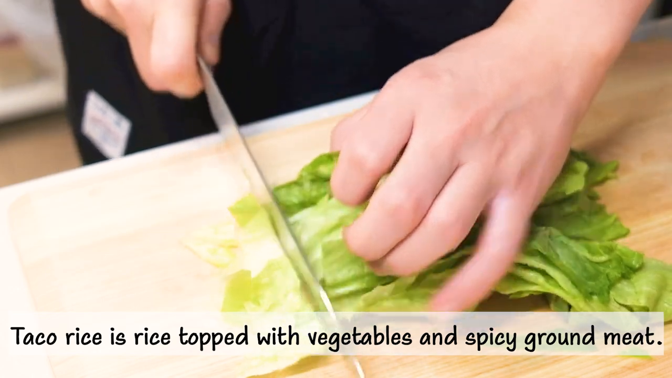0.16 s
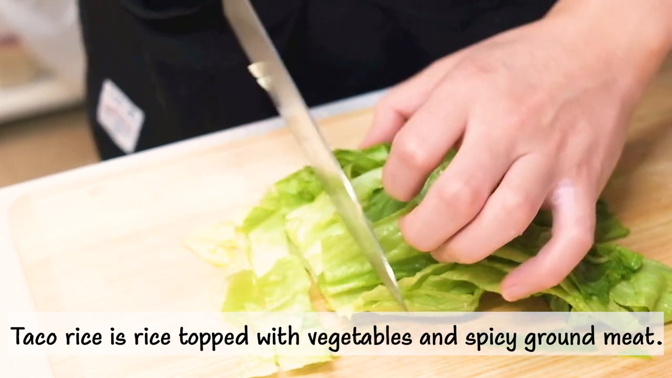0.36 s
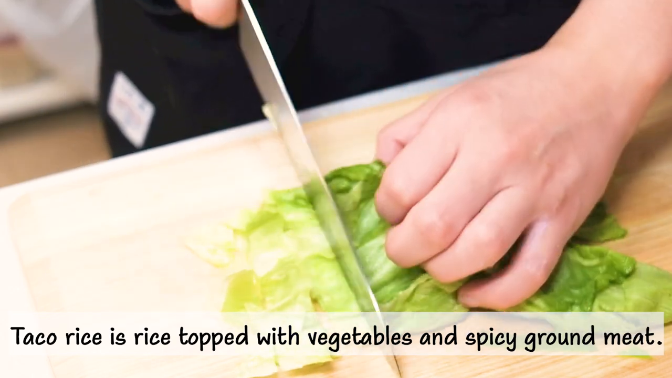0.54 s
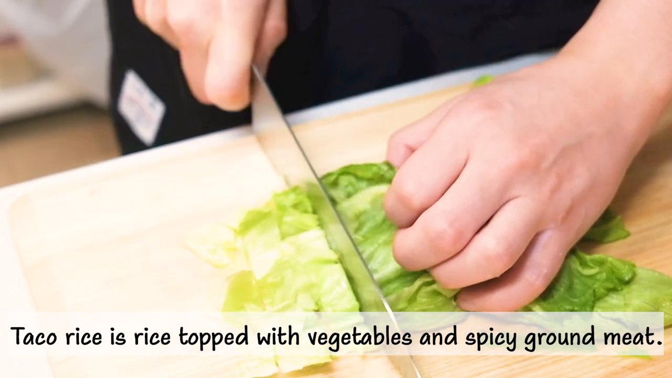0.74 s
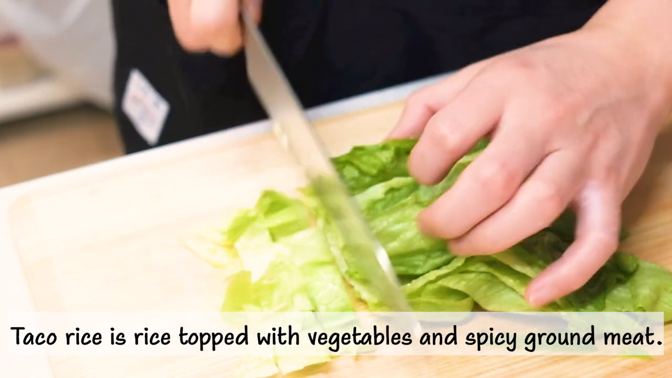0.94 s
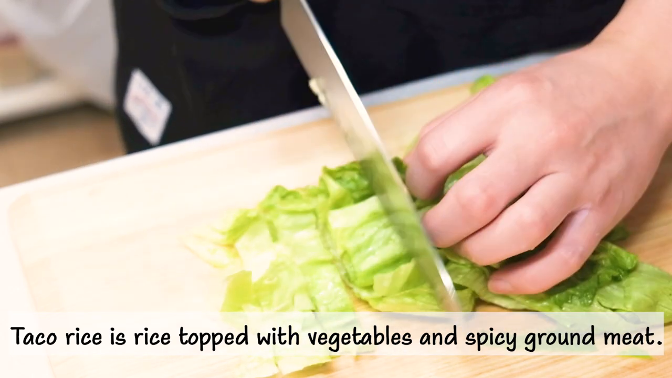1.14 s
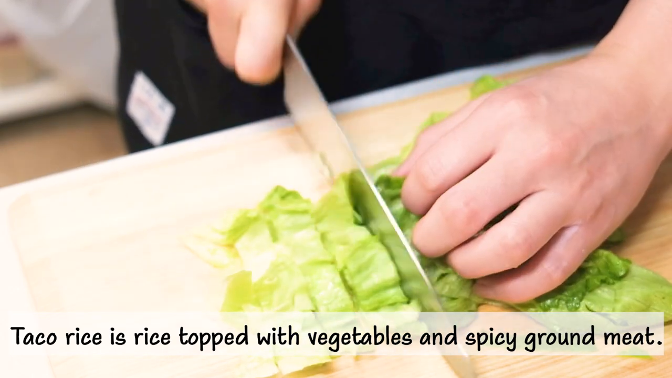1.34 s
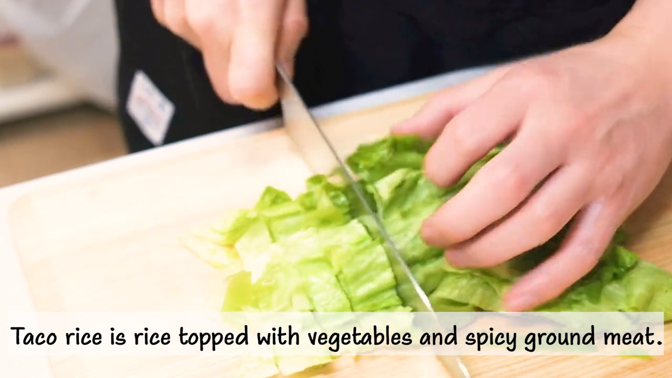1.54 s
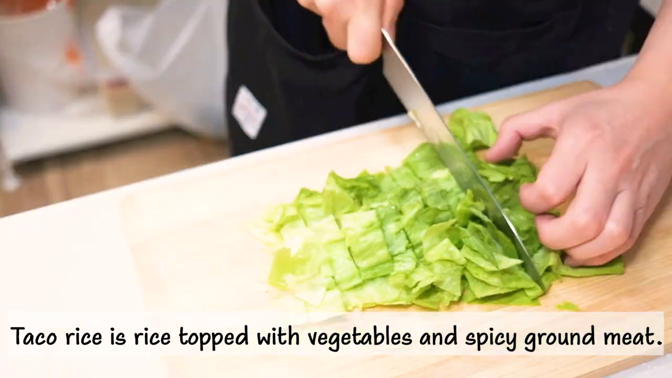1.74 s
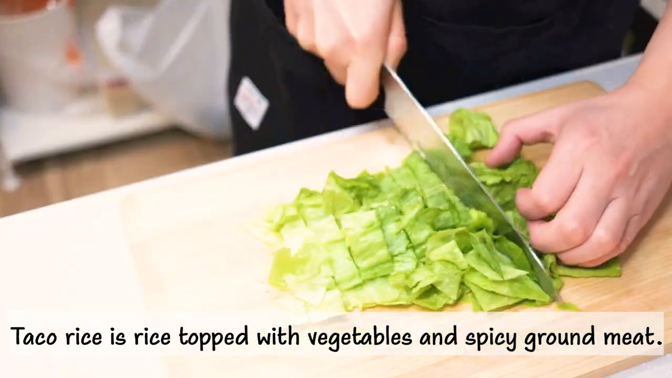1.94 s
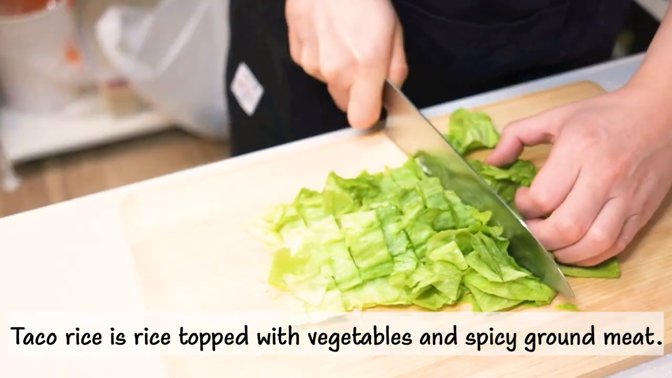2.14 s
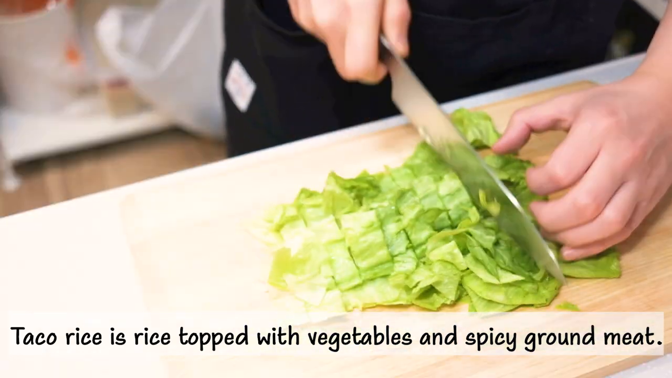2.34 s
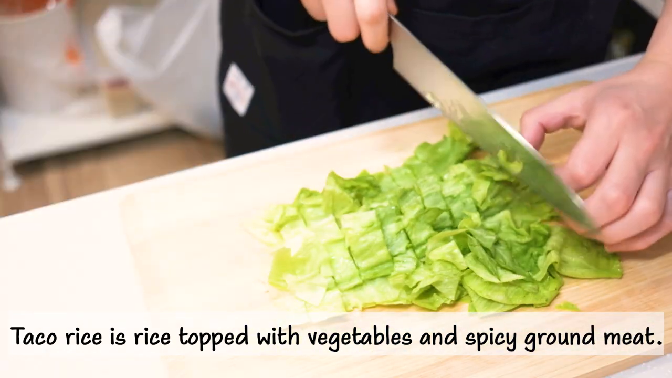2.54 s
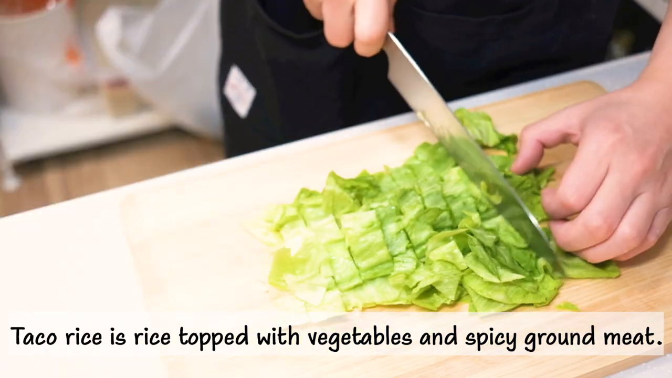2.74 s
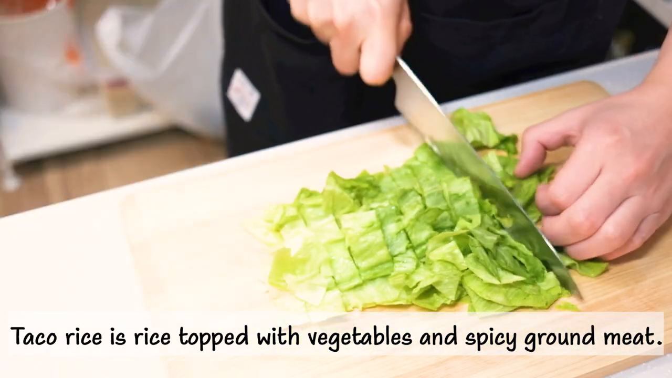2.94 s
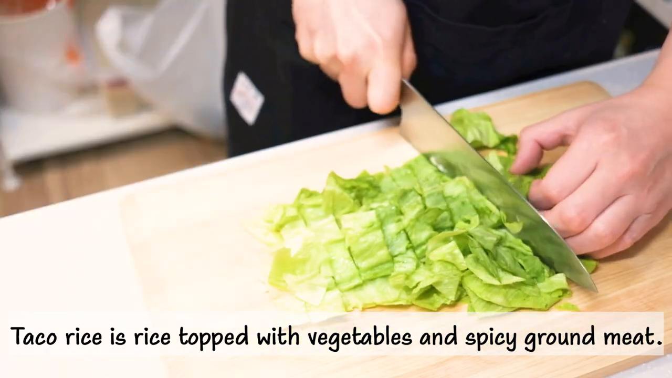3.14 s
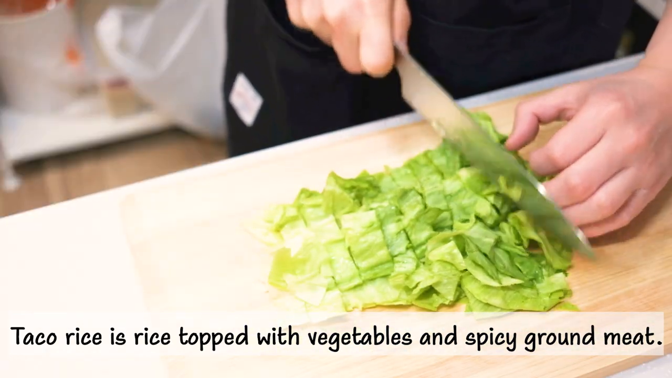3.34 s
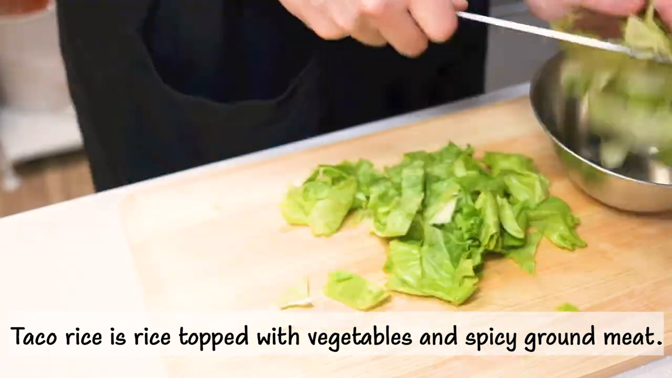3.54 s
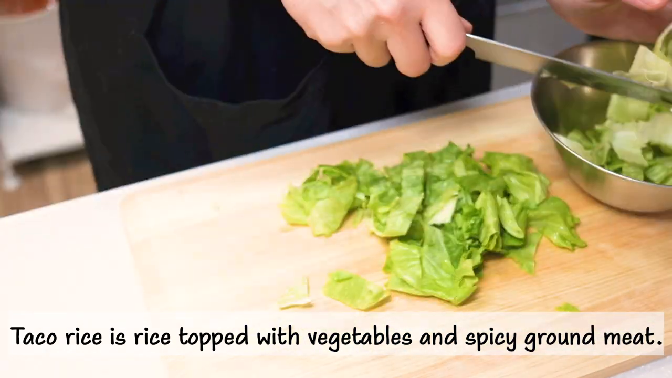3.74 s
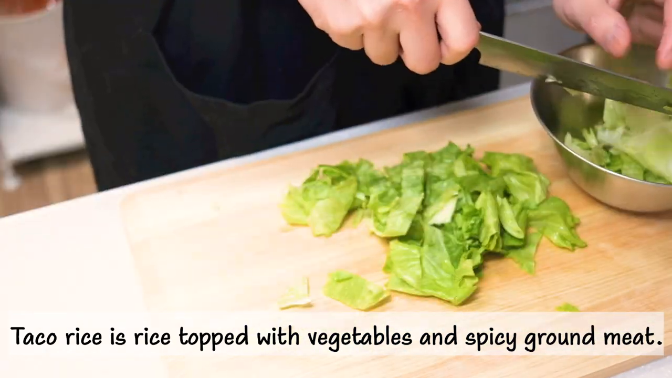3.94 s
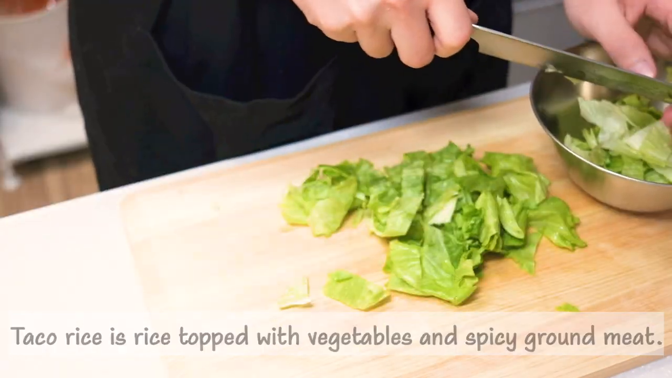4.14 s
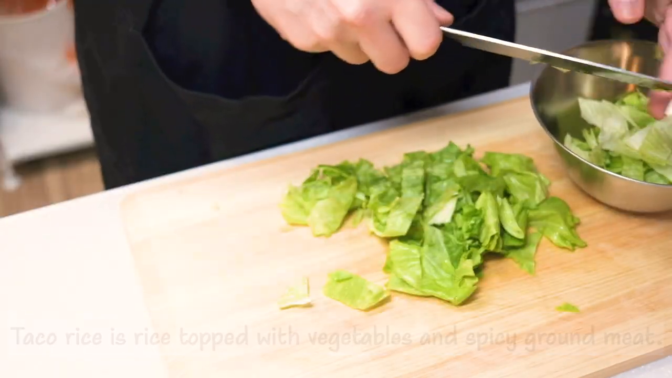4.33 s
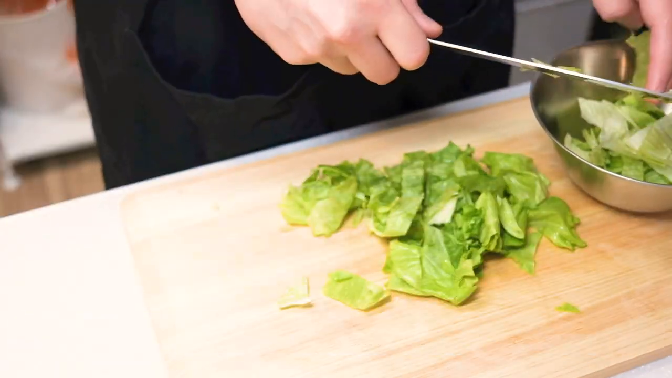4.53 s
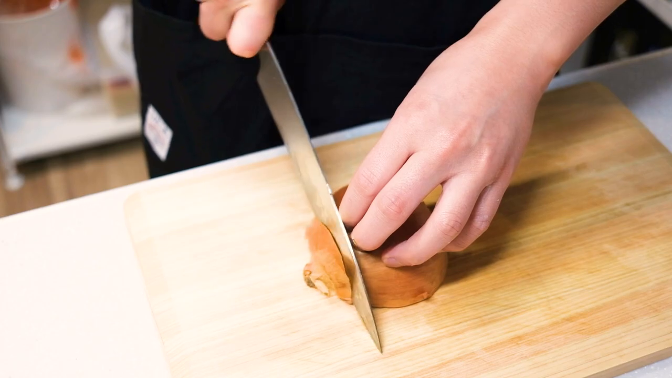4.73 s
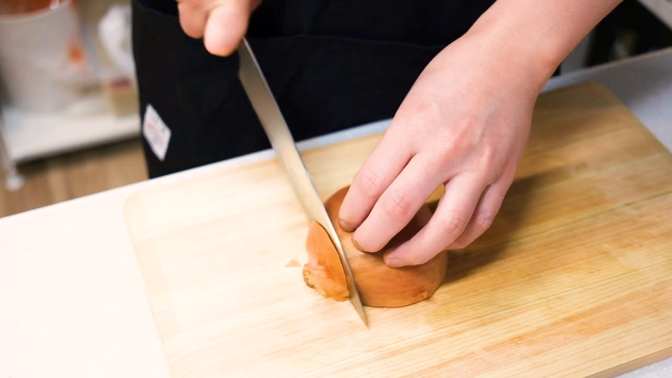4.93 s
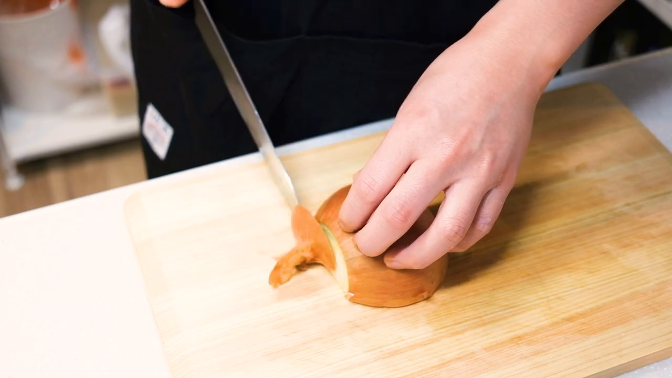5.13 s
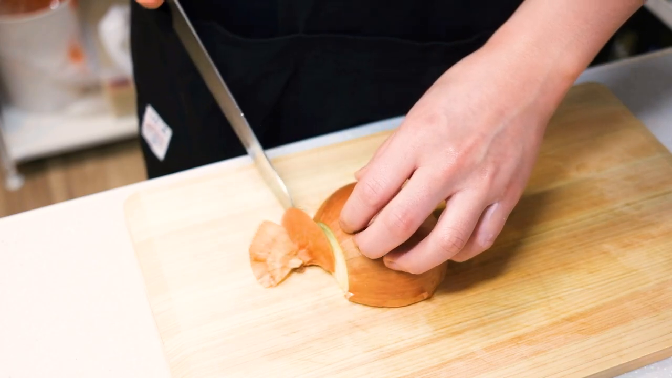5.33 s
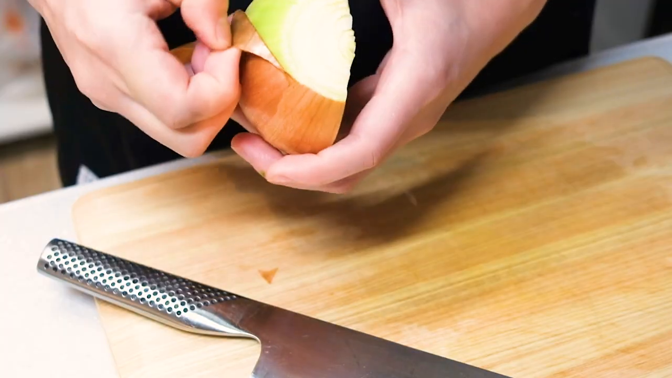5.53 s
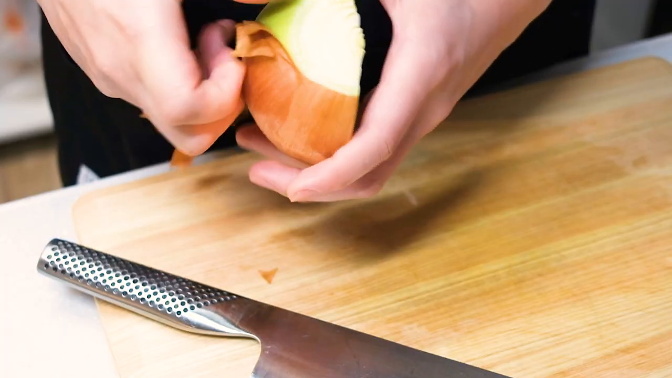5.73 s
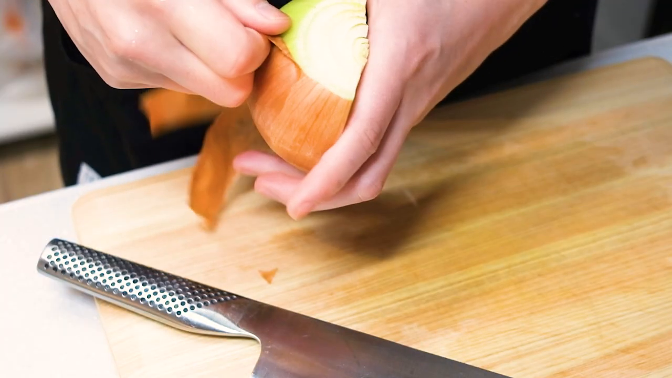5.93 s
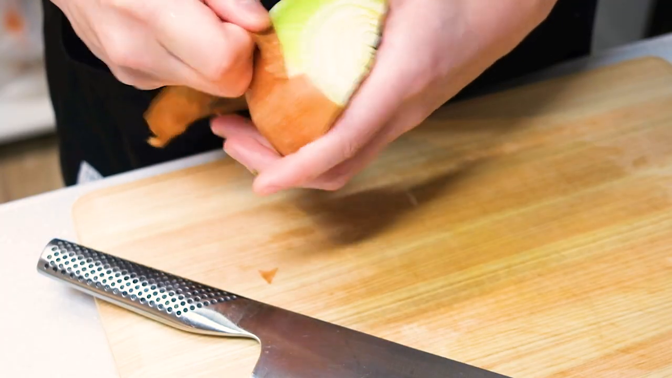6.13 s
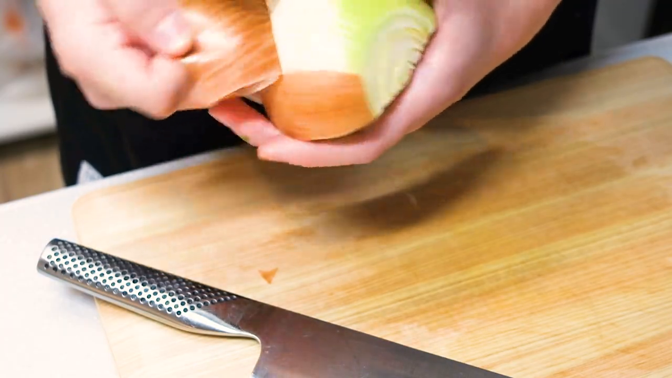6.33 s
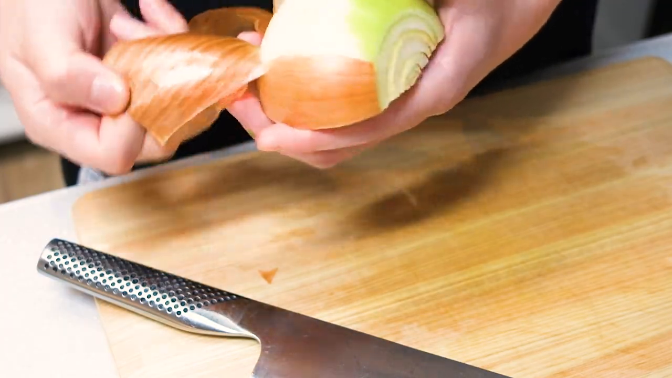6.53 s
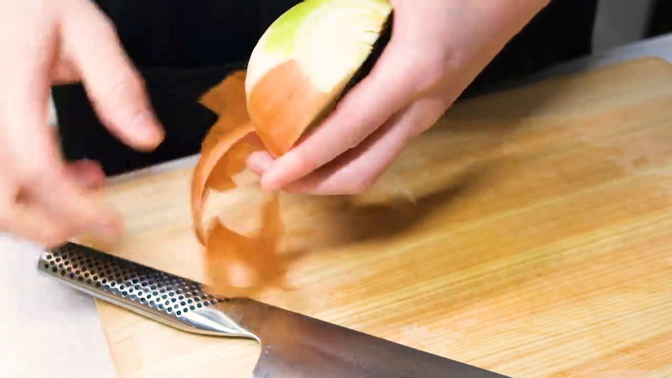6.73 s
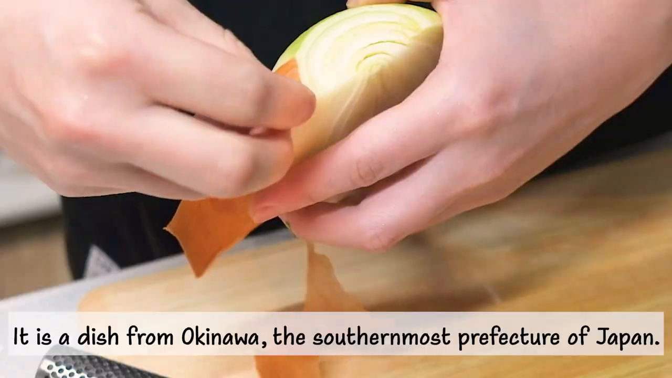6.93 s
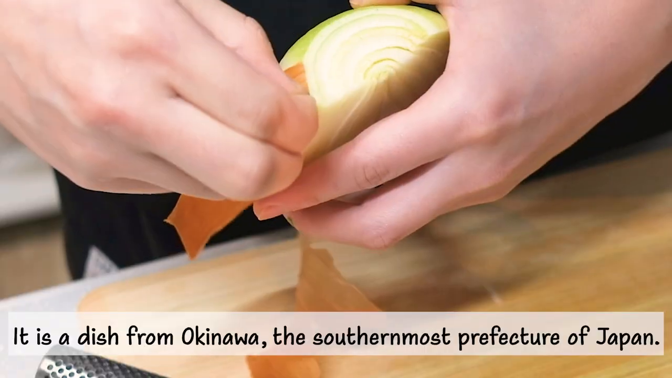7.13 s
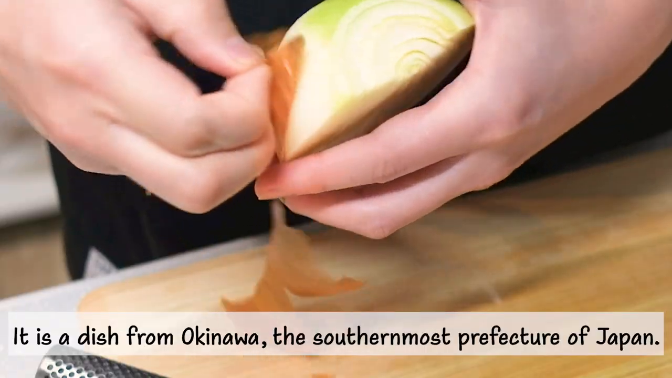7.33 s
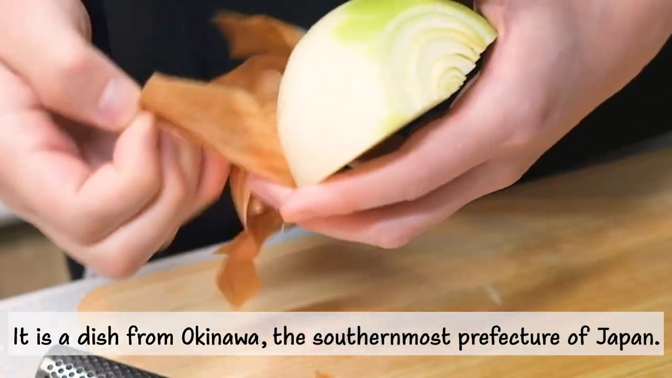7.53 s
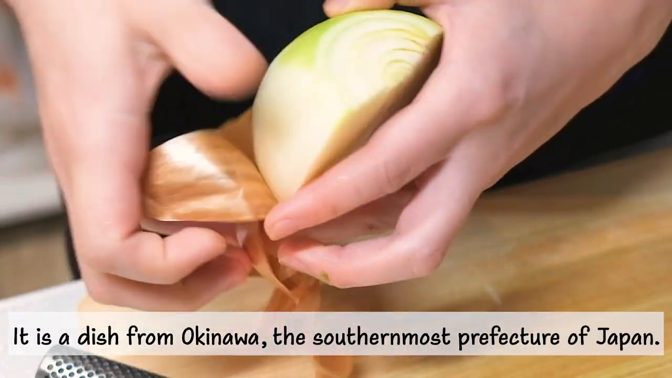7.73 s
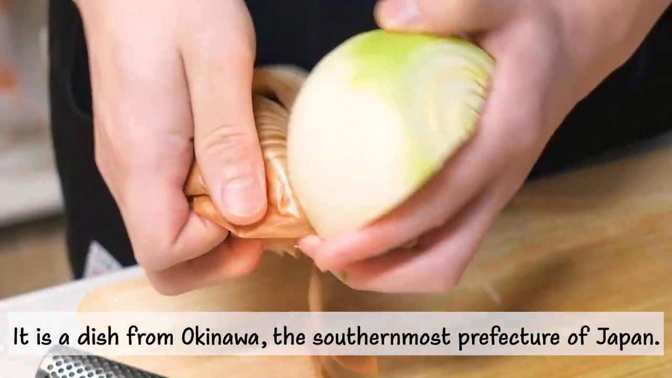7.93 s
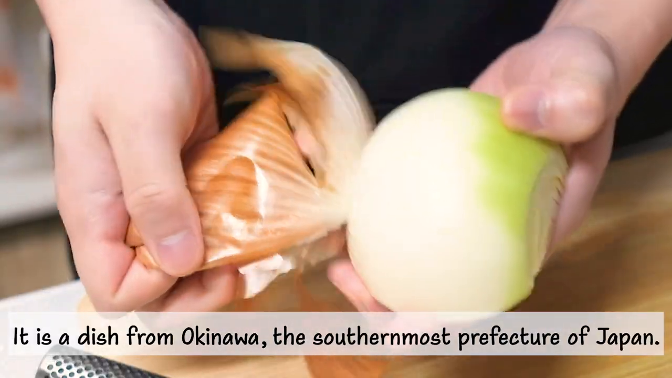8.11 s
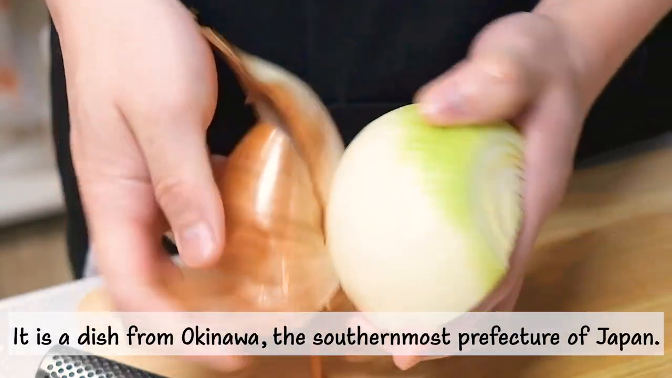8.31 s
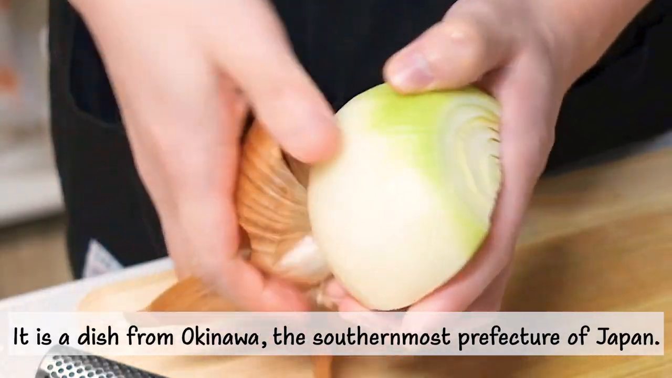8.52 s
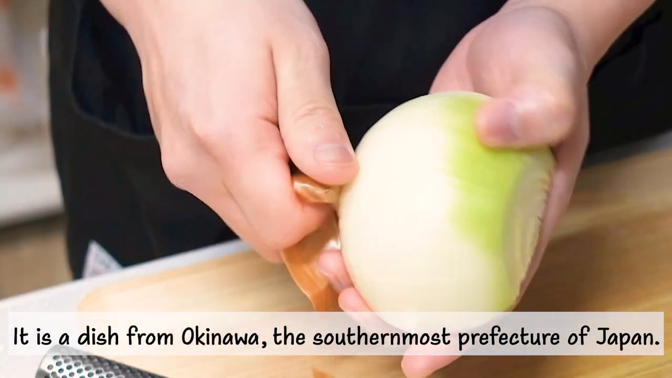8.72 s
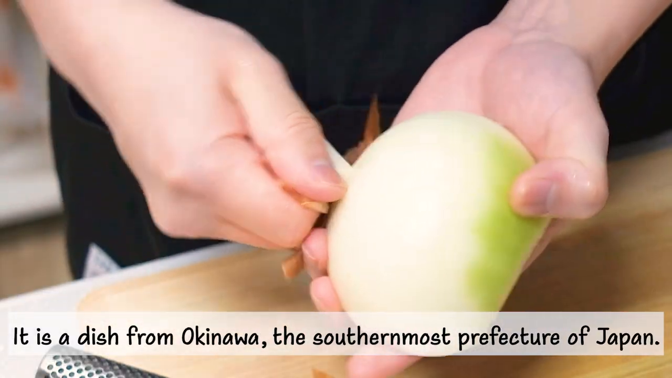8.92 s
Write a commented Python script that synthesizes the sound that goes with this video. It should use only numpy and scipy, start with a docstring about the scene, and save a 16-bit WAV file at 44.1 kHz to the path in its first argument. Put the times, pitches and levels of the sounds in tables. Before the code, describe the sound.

Close microphone in a small quiet kitchen. A chef's knife makes four slow, juicy crunches through lettuce, some with hard wooden knocks and a short rasp of edge on board. Leaves rustle softly, the blade ticks faintly, then a heavy chop parts an onion. Finally dry skin is peeled off in sharp, bright, irregular crackles.

```python
"""Lettuce and onion on a board

A chef's knife shreds lettuce on a wooden board, then cuts the end off an onion; hands peel its dry skin.
Leaves, flesh and skin are rains of tiny noise bursts plus rubbing noise, with larger snaps for ribs and cracks.
Blows ring the modes of the board, taps those of the blade; the edge rasps on wood and the worktop sways.
One close microphone in a small, quiet kitchen, with room noise and a thin electrical whine at first."""
import sys
import numpy as np
from scipy import signal
from scipy.io import wavfile
from scipy.ndimage import uniform_filter1d

SR = 44100
rng = np.random.default_rng(int(sys.argv[2]) if len(sys.argv) > 2 else 0)


def log_audio(samples):
    """Write samples as a 16-bit WAV file to the path given in sys.argv[1]."""
    # one column per channel
    frames = np.atleast_2d(samples).T
    # limit to full scale, then quantise
    limited = np.clip(frames, -1, 1)
    pcm = np.round(limited * 32767).astype(np.int16)
    wavfile.write(sys.argv[1], SR, pcm)


N = 395577
TIME = np.arange(N) / SR


def amp(db):
    """Decibels to gain."""
    return 10 ** (np.asarray(db) / 20)


def read(points, hz):
    """A table of (Hz, value) read on a log-frequency axis."""
    f, value = np.transpose(points)
    return np.interp(np.log(hz + 1), np.log(f + 1), value)


def add(mix, s, sound):
    """Mixes a sound in at time s."""
    part = mix[max(round(s * SR), 0):][:len(sound)]
    part += sound[:len(part)]


def evened(x):
    """Scales to rms 1."""
    return x / np.sqrt(np.mean(x ** 2) + 1e-20)


def band(x, lo_hz, hi_hz, order=3):
    """Causal band-pass."""
    edges = [lo_hz, min(hi_hz, SR / 2 - 1)]
    return signal.sosfilt(signal.butter(order, edges, "band", fs=SR, output="sos"), x)


def shelf(x, db, edge_hz, side):
    """Lifts or lowers everything on one side ("lowpass" or "highpass") of an edge by the curve db."""
    one_side = signal.sosfiltfilt(signal.butter(2, edge_hz, side, fs=SR, output="sos"), x)
    return x + (amp(db) - 1) * one_side


def minimum_phase(log_gain):
    """Impulse response of a log spectrum, with its energy as early as possible, so clicks stay sharp."""
    return np.exp(np.conj(signal.hilbert(log_gain)))


def colour(x, points, size=4096):
    """Causal filter with the given spectrum, so that clicks keep their sharp front."""
    gain_db = np.maximum(read(points, abs(np.fft.fftfreq(size, 1 / SR))), -100)
    taps = np.fft.ifft(minimum_phase(np.log(amp(gain_db)))).real[:size // 2]
    return signal.oaconvolve(x, taps)[:len(x)]


def running_rms(x, size=700):
    """Level over a few hundredths of a second."""
    power = uniform_filter1d(uniform_filter1d(x ** 2, size), size)
    return np.sqrt(abs(power) + 1e-12)


def fracture(hz, decay_s, octaves, size=256):
    """One break: a burst of noise, dying in about a millisecond, tinted around the pitch of its flake."""
    burst = rng.standard_normal(size) * np.exp(-np.arange(size) / SR / decay_s)
    pitch = np.log2((abs(np.fft.fftfreq(size, 1 / SR)) + 50) / hz)
    tint = minimum_phase(-np.log(1 + (pitch / octaves) ** 2))
    ring = np.fft.ifft(np.fft.fft(burst) * tint).real
    return ring / np.linalg.norm(ring)


def fractures(per_s, spread_db, clump_db, decay_s, octaves, count=28):
    """A random rain of breaks of many pitches, most tiny and a few large; a wandering strain clumps them."""
    strain = evened(band(rng.standard_normal(N), 25, 130, order=1))
    size_db = spread_db * np.minimum(rng.exponential(1, N), 4) + clump_db * np.minimum(strain, 1.5)
    sizes = amp(size_db) * (rng.random(N) < per_s / SR)
    kind = rng.integers(0, count, N)
    at = np.flatnonzero(sizes)
    shapes = np.array([fracture(hz, decay_s, octaves) for hz in np.geomspace(1200, 15000, count)])
    shapes *= np.sqrt(np.geomspace(1, 10, count))[:, None]  # high breaks spread over a wider band
    places = at[:, None] + np.arange(shapes.shape[1])
    breaks = shapes[kind[at]] * sizes[at, None]
    return evened(np.bincount(places.ravel(), breaks.ravel(), N)[:N])


def crunch(gains, spectrum, grains, rub_db, crisp_db, body_db, lumps_db):
    """Breaks and rubbing heard directly (crisp) and through the flexing material (body), giving way unevenly."""
    sound = colour(grains + amp(rub_db) * rng.standard_normal(N), spectrum)
    crisp, body = band(sound, 2800, 20000), band(sound, 70, 2800, order=5)
    # both are levelled first, so that the movements alone shape them
    crisp = crisp / running_rms(crisp)
    body = body / running_rms(band(body, 700, 2800))
    lumps = np.clip(evened(band(rng.standard_normal(N), 15, 50, order=2)), -2, 2)
    return amp(lumps_db * lumps) * (amp(crisp_db) * gains[0] * crisp + amp(body_db) * gains[1] * body)


# colour of a loud crack: f/Hz, level/dB
SNAP_COLOUR = [(200, -29), (700, 2), (3000, -3), (6500, -3.5), (8600, 4), (10500, -13.5), (13000, 0.5),
               (16000, -11.5)]


def snaps(rows, octaves, decay_s, crest_db, shiver_db, shiver_s, rise_s=.0007):
    """Each crack, rise_s after its listed time, is one large fracture, and the freed piece shivers."""
    out, t = np.zeros(N), np.arange(1024) / SR
    for s, peak_db, hz in rows:
        shiver = rng.standard_normal(len(t)) * np.exp(-t / shiver_s)
        shiver *= amp(shiver_db) / np.linalg.norm(shiver)
        shiver[0] += 1
        crack = colour(signal.fftconvolve(shiver, fracture(hz, decay_s, octaves)), SNAP_COLOUR, size=512)
        # the peak stands crest_db over the level taken across 1 ms
        level = amp(peak_db - crest_db) * np.sqrt(SR / 1000)
        add(out, s + rise_s, level * crack / np.linalg.norm(crack))
    return out


def swell(s, rise_s, hold_s, fall_db_per_s):
    """The gain of one movement: it swells from 15.5 dB down, holds and dies away."""
    end = s + rise_s + hold_s
    db = np.interp(TIME, [s, s + rise_s], [-15.5, 0], left=-120)
    return amp(db - fall_db_per_s * np.maximum(TIME - end, 0))


def together(parts):
    """Crisp and body gains of overlapping movements, each given as (gain, body dB), summed in power."""
    return np.sqrt(sum(np.array([gain, gain * amp(body_db)]) ** 2 for gain, body_db in parts))


def movements(rows, fall_db_per_s):
    """Crisp and body gains of a run of small movements."""
    return together((amp(db) * swell(s, rise_s, hold_s, fall_db_per_s), body_db)
                    for s, rise_s, hold_s, db, body_db in rows)


# colour of the room noise: f/Hz, level/dB
AIR_COLOUR = [(15, -40), (25, 2), (76, -13.5), (108, -2.5), (190, -5), (236, -8), (270, -6.5), (416, -8),
              (863, -10.5), (1020, -13.5), (1190, -13), (1400, -15.5), (2610, -23), (8590, -28),
              (16000, -36)]
AIR_DB = -55.5
WHINE_HZ, WHINE_DB, WHINE_END_S = 9950, -73.5, 2.1


def air():
    """Steady room noise, with a thin electrical whine during the first cuts."""
    hiss = evened(colour(rng.standard_normal(N), AIR_COLOUR, size=8192))
    fade = np.clip((WHINE_END_S - TIME) * 20, 0, 1)
    whine = np.sqrt(2) * np.sin(2 * np.pi * WHINE_HZ * TIME) * fade
    return amp(AIR_DB) * hiss + amp(WHINE_DB) * whine


# the blade presses on the leaves before it bites; levels are against the stroke's level
PRESS_S, PRESS_START_DB, PRESS_END_DB, BITE_S = 0.091, -24.5, -13.5, 0.003
THICK_S, STOP_DB_PER_S = 0.014, 342
# body against crisp: the crunch deepens as the blade nears the board
BITE_BODY_DB, STOP_BODY_DB = -9, -5


def stroke(bite, thick, stop, level_db, thick_db):
    """The blade presses, bites, meets the thick of the leaves and stops: (gain, body dB)."""
    press = np.interp(TIME, [bite - PRESS_S, bite - BITE_S, bite], [PRESS_START_DB, PRESS_END_DB, 0],
                      left=-np.inf)
    crush = thick_db * np.exp(-((TIME - thick) / THICK_S) ** 2 / 2)
    release = STOP_DB_PER_S * np.maximum(TIME - stop, 0)
    body_db = np.interp(TIME, [bite, stop], [BITE_BODY_DB, STOP_BODY_DB])
    return amp(level_db + press + crush - release), body_db


# strokes through the lettuce, before the leaf trims: blade bites t/s, thick of the leaves t/s, stops t/s,
# level/dB, change of level in the thick/dB
STROKES = [(-.15, -.08, 0.011, -35, 2), (0.565, 0.602, 0.74, -35.5, 7.5), (1.267, 1.363, 1.456, -33.5, 10),
           (1.883, 1.94, 2.074, -32, -5.5), (2.89, 3.015, 3.087, -34, 2.5)]
# leaves shifted by hand and blade between strokes, before the leaf trims: t/s, rise/s, hold/s,
# level/dB, body against crisp/dB
RUSTLES = [(.115, 0.0033, 0.049, -52.5, -2), (.22, 0.076, 0.19, -62, 0), (.495, 0.014, 0.056, -45.5, -5),
           (.8, .02, 0.071, -59, -3), (.97, 0.069, 0.11, -61, 2), (1.205, .004, .018, -50, -13),
           (1.55, 0.0068, 0.011, -52.5, -2), (1.76, 0.019, 0.0082, -42, -11),
           (2.17, 0.037, .06, -55.5, 4.5), (2.316, 0.0044, 0.029, -53.5, 5.5), (2.35, .03, 0.48, -65, -18),
           (2.81, 0.045, 0.022, -49.5, 1.5), (3.21, 0.03, 0.012, -54.5, 0.5),
           (3.293, 0.0027, .005, -53, -9), (3.32, 0.063, 0.13, -61.5, 3),
           (3.605, 0.025, 0.029, -46.5, -1.5), (3.7, .02, .07, -64, 3), (3.992, .004, 0.011, -63, 4),
           (4.1, .12, 0.16, -66, 8.5)]
# colour of wet leaf: f/Hz, level/dB
LEAF_COLOUR = [(47, -81), (80, -2.5), (309, 6), (378, 1.5), (751, 2), (1250, 2), (1630, -4), (1740, -3.5),
               (2270, -7), (3790, -6), (6740, -8.5), (8410, -6), (10500, -18), (13400, -12.5), (16000, -26)]


def lettuce():
    """Wet leaves crush under each stroke and rustle when shifted: breaks and rub through a leafy colour."""
    wet = fractures(per_s=2000, spread_db=4.5, clump_db=2.5, decay_s=0.00076, octaves=1.21)
    cutting = together(stroke(*row) for row in STROKES)
    shredding = np.hypot(cutting, movements(RUSTLES, fall_db_per_s=229))
    return crunch(shredding, LEAF_COLOUR, wet, rub_db=-3.5, crisp_db=-0.24, body_db=-5, lumps_db=1.93)


# modes of the board on its worktop, before each blow detunes them: f/Hz, level/dB, t60/s
BOARD_MODES = [(124, -11, 0.063), (168, -17, 0.11), (253.6, -7, 0.06), (319, -3, 0.043), (475, 0, 0.04),
               (513, 0, 0.026), (625, 0.5, 0.022), (782, -1.5, 0.022), (832, 2.5, 0.018), (986, 7.5, 0.018),
               (1400, -39, .012), (1790, 1.5, 0.026), (2170, -11, .015), (2526, 6.5, 0.021),
               (3570, -21, .02)]
# blade and knuckles meeting the board: t/s, peak level/dB, hardness as a cut-off above 80 Hz f/Hz,
# skid after the blow level/dB
KNOCKS = [(0.006, -32.5, 199, 8), (0.141, -30, 213, -0.5), (0.6215, -5, 1440, -9.5),
          (1.0921, -31, 4970, 10), (1.3697, -9.5, 1100, -4.5), (1.385, -26, 600, -22),
          (1.56, -36.5, 173, 5), (1.901, -27, 94, -7.5), (1.9064, -23.5, 500, -0.5), (2.32, -36, 1810, 13),
          (2.907, -30.5, 134, -4), (2.925, -27.5, 350, -13), (3.645, -33, 70.4, -5),
          (3.668, -47, 130.6, 10), (4.7591, -7.5, 543, -23), (4.921, -17, 496, -5)]


def knocks(skid_s=0.018, low_hz=80):
    """A blow and a short skid ring the board; a soft contact leaves out the high modes."""
    out, t = np.zeros(N), np.arange(SR // 3) / SR
    for s, peak_db, hard_hz, skid_db in KNOCKS:
        force = rng.standard_normal(len(t)) * np.exp(-t / skid_s)
        force *= amp(skid_db) / np.linalg.norm(force)
        force[0] += 1
        # the hand loads the board differently each time
        detune = 1 + .02 * rng.standard_normal(len(BOARD_MODES))
        ring = sum(amp(db - 60 * t / t60) * np.cos(2 * np.pi * hz * d * t)
                   for (hz, db, t60), d in zip(BOARD_MODES, detune))
        sound = band(signal.fftconvolve(force, ring), low_hz, low_hz + hard_hz, order=2)
        add(out, s, amp(peak_db) * sound / abs(sound).max())
    return out


# resonances of edge on wood at pitch factor 1: f/Hz, width f/Hz, level/dB
DRAG_MODES = [(1250, 150, 0), (1770, 140, -10), (2580, 200, -12)]
# the edge drawn along the wood as strokes end: middle t/s, spread of the bell-shaped swell/s,
# level/dB, pitch as a factor
DRAGS = [(0.013, 0.024, -37.5, 0.91), (0.699, 0.041, -42.5, 0.87), (1.428, 0.036, -44, 1.16),
         (2.031, 0.026, -36, 1.03), (2.078, 0.011, -35, 1.38), (3.008, 0.016, -38, 1.08),
         (3.067, .026, -36.5, 1.02)]


def drags():
    """An edge that slides on the wood rasps in a few narrow resonances, higher when it slides faster."""
    out = np.zeros(N)
    for s, spread_s, level_db, pitch in DRAGS:
        t = np.arange(-3 * spread_s, 3 * spread_s, 1 / SR)
        t = t[t + s >= 0]
        rub = rng.standard_normal(len(t))
        rasp = sum(amp(db) * band(rub, hz * pitch - width / 2, hz * pitch + width / 2, order=1)
                   for hz, width, db in DRAG_MODES)
        add(out, s + t[0], amp(level_db) * evened(rasp) * np.exp(-(t / spread_s) ** 2 / 2))
    return out


# ribs and fibres that snap under the blade: t/s, nominal peak level/dB, centre f/Hz
RIB_SNAPS = [(0.577, -16, 5640), (0.59, -20, 4800), (0.6163, -7, 6000), (0.6838, -14, 8100),
             (1.2625, -16, 8340), (1.271, -15.5, 8700), (1.293, -14, 6900), (1.329, -11, 8600),
             (1.334, -6.5, 7950), (1.3573, -5, 5490), (1.8896, -12.5, 2250), (1.94, -9.5, 2970),
             (1.9579, -10.5, 3770), (1.9724, -22, 4030), (2.0816, -11, 2630), (2.833, -27, 5110),
             (2.902, -14.5, 3660), (2.9577, -8.5, 3750), (3.643, -32, 6000), (3.6708, -24, 2860),
             (3.994, -34, 2110), (4.7576, -6.5, 2480)]


def ribs():
    """Stiff ribs break in single loud fractures with a short shiver."""
    return snaps(RIB_SNAPS, octaves=0.84, decay_s=.001, crest_db=8.5, shiver_db=-2, shiver_s=0.0052)


# the worktop swaying after each push: t/s, peak level/dB, f/Hz
SWAYS = [(0.64, -40.5, 16), (1.46, -39.5, 21), (2.101, -42.5, 19.5), (3.1, -42, 20), (4.77, -29.5, 20.8),
         (4.98, -38.5, 19)]


def worktop(swell_s=0.07):
    """A slow wobble that builds up and dies after each push."""
    out, t = np.zeros(N), np.arange(SR) / SR
    for s, db, hz in SWAYS:
        envelope = t / swell_s * np.exp(1 - t / swell_s)
        add(out, s, amp(db) * envelope * np.sin(2 * np.pi * hz * t))
    return out


# modes of the undamped steel blade: f/Hz, level/dB, t60/s
BLADE_MODES = [(2859, -20, 0.12), (6000, -17, .2), (5617, -4, 0.41), (5830, -5, .08), (6050, 0, 0.15),
               (6480, 1, 0.15), (7500, 0, .12), (8050, 3, .08), (8720, 4, .1), (9200, 7, 0.11),
               (12000, 8, 0.11), (12800, 9, 0.088), (14500, -4, .06)]
# the blade tapped and brushed: t/s, peak level/dB, rise/s, brightness as a cut-off f/Hz, damping as a factor
BLADE_TOUCHES = [(1.092, -49, 0.0016, 1900, 2), (3.643, -33, 0.0005, 4300, 0.93),
                 (3.67, -33, 0.00058, 3200, 1.5), (4.075, -47, 0.05, 12000, 7.5)]


def blade(tap_s=.004, slide_db=-7):
    """A quick touch taps the blade and slides a little, a slow one only slides; a finger left on damps it."""
    out, t = np.zeros(N), np.arange(SR // 2) / SR
    for s, db, rise_s, bright_hz, damping in BLADE_TOUCHES:
        ring = sum(amp(mode_db - 60 * damping * t / t60) / (1 + (hz / bright_hz) ** 4)
                   * np.sin(2 * np.pi * hz * t) for hz, mode_db, t60 in BLADE_MODES)
        force = rng.standard_normal(len(t)) * t * np.exp(-t / rise_s)
        force *= amp(slide_db) / np.linalg.norm(force)
        force[0] += np.exp(-rise_s / tap_s)
        sound = signal.fftconvolve(ring, force)
        add(out, s, amp(db) * sound / abs(sound).max())
    return out


# the blade chops the onion, settles in the cut, shifts and slides out, before the flesh trims: t/s, rise/s,
# hold/s, level/dB, body against crisp/dB, fall/dB per s
ONION_CUTS = [(4.702, 0.0026, 0.048, -26.5, -4.5, 602), (4.75, 0.0075, .01, -42, 1.5, 106),
              (4.913, 0.0047, .008, -36, -4, 503), (4.905, 0.069, 0.065, -30.5, -8.5, 136),
              (5.06, .05, .02, -44, -2.5, 65)]
# colour of onion flesh: f/Hz, level/dB
FLESH_COLOUR = [(47, -20), (80, 2.5), (289, 5.5), (877, -7), (1140, -4), (3320, -10), (3960, -12),
                (5170, -8.5), (6740, -13), (8790, -9), (10700, -21.5), (13400, -12), (16000, -29)]


def onion():
    """Dense flesh parts in a thick rain of short, similar breaks with much rubbing."""
    dense = fractures(per_s=5000, spread_db=1, clump_db=2.5, decay_s=0.00042, octaves=1.6)
    slicing = together((amp(db) * swell(s, rise_s, hold_s, fall), body_db)
                       for s, rise_s, hold_s, db, body_db, fall in ONION_CUTS)
    return crunch(slicing, FLESH_COLOUR, dense, rub_db=-1, crisp_db=-1.6, body_db=-5.1, lumps_db=0.9)


# the loudest cracks of the dry skin, before the layer tone: t/s, nominal peak level/dB, centre f/Hz
SKIN_SNAPS = [(5.4016, -25.5, 8540), (5.439, -12.5, 7160), (5.4799, -29, 9000), (5.5089, -17.5, 8900),
              (5.6437, -15.5, 3970), (5.7146, -8.5, 8300), (5.7217, -14, 4930), (5.8508, -10, 6400),
              (5.855, -19, 6740), (5.8659, -7, 6900), (5.877, -7.5, 7210), (5.9194, -14, 7800),
              (5.9314, -16, 6050), (5.9454, -17, 4800), (5.9746, -5.5, 8400), (6.0294, -12.5, 7960),
              (6.048, -13.5, 6320), (6.0802, -10.5, 9050), (6.102, -14.5, 4020), (6.1764, -3.5, 3950),
              (6.2242, -10, 7600), (6.3265, -12.5, 8100), (6.3804, -4.5, 4730), (6.4074, -5, 4860),
              (6.4637, -9, 4090), (6.4778, -14, 6340), (6.5884, -25, 8580), (6.6148, -9.5, 8900),
              (6.8592, -27.5, 5250), (7.4101, -17.5, 8800), (7.5403, -14.5, 8550), (7.655, -20, 4800),
              (7.897, -15.5, 4560), (7.9359, -10, 7930), (7.9444, -12.5, 8780), (7.9693, -20, 5490),
              (8.0045, -10, 8750), (8.0638, -6.5, 8850), (8.1279, -7, 5700), (8.1903, -21, 4950),
              (8.2441, -12.5, 3640), (8.3035, -21.5, 8640), (8.3744, -18.5, 5400), (8.4073, -17, 5310),
              (8.4292, -14, 5600), (8.4792, -7, 8900), (8.5694, -6, 8500), (8.6552, -9.5, 7980),
              (8.6902, -5.5, 4360), (8.7974, -14, 8450), (8.8336, -10.5, 8830), (8.9486, -19.5, 7920)]
# dry skin pulled off and crumpled, before the skin trims: t/s, rise/s, hold/s, level/dB, body against crisp/dB
PULLS = [(5.42, 0.017, 0.14, -47, -24), (5.711, 0.0054, 0.0094, -30, -13), (5.81, 0.015, 0.22, -46.5, -34),
         (6.07, .012, 0.072, -34, -19), (6.174, 0.0065, 0.17, -31.5, -13),
         (6.28, 0.078, 0.095, -28.5, -7.5), (6.37, 0.027, 0.036, -28, 0), (6.5, 0.049, 0.063, -48.5, -2.5),
         (6.575, 0.011, .03, -35, -10), (6.61, 0.031, 0.033, -31, -14.5), (6.73, .01, 0.047, -49, -12),
         (6.935, .006, .025, -57, -17), (7.19, 0.054, 0.095, -58.5, -9), (7.305, 0.054, 0.21, -40.5, -14.5),
         (7.57, 0.027, 0.46, -49.5, -8.5), (7.925, 0.0065, 0.072, -38.5, -11.5),
         (8.015, 0.023, 0.11, -33, -7), (8.18, .01, 0.089, -46, -4.5), (8.28, 0.018, .015, -41.5, -7),
         (8.35, 0.014, 0.09, -42, -3), (8.485, 0.025, 0.051, -27, -14), (8.56, 0.0039, 0.051, -30, -3),
         (8.654, 0.0013, 0.057, -28.5, -8.5), (8.74, 0.01, 0.095, -33.5, -10.5),
         (8.87, 0.026, 0.083, -48, -5)]
# colour of dry skin: f/Hz, level/dB
SKIN_COLOUR = [(120, -29), (200, -3.5), (590, -9.5), (883, -15.5), (1320, -20), (1480, -15), (2290, -12),
               (2560, -13), (3310, -10), (4860, 1.5), (5630, 0), (8120, 2), (10500, -5), (13600, 0.5),
               (16000, -18)]
# papery outer skin gives way to a softer inner layer: t/s, top treble level/dB, body of each crack level/dB
SKIN_LAYERS = [(5.9, 6, -4), (6.6, 3.5, 5), (7.6, -0.5, 9), (8.9, -1, 7)]


def peel():
    """Skin tears in fine breaks and loud cracks and shakes its loose flap; it is too light to radiate bass."""
    dry = fractures(per_s=1600, spread_db=3.4, clump_db=2.0, decay_s=0.00053, octaves=0.72)
    pulling = movements(PULLS, fall_db_per_s=291)
    tearing = crunch(pulling, SKIN_COLOUR, dry, rub_db=-11, crisp_db=-.2, body_db=-.5, lumps_db=1.2)
    cracks = snaps(SKIN_SNAPS, octaves=0.94, decay_s=.001, crest_db=8.5, shiver_db=-6, shiver_s=0.011)
    s, top_db, body_db = np.transpose(SKIN_LAYERS)
    cracks = shelf(cracks, np.interp(TIME, s, body_db), 2800, "lowpass")
    skin = tearing + cracks + pulling[0] * flap(dry, width_hz=900)
    skin = shelf(skin, np.interp(TIME, s, top_db), 13200, "highpass")
    return band(skin, 560, 20000, order=3) + fingers(dry)


def resonate(x, hz, width):
    """A resonance of gain 1 that follows the curve hz."""
    turn = np.exp(2j * np.pi * np.cumsum(hz) / SR)
    r = np.exp(-np.pi * width / SR)
    return 2 * (turn * signal.lfilter([1 - r], [1, -r], x / turn)).real


# a loose flap of skin, mostly ringing lower as it grows: start t/s, end t/s, start f/Hz, end f/Hz,
# level against the crisp pulls/dB
FLAPS = [(5.82, 5.975, 7000, 6450, 0), (6.067, 6.462, 4400, 2130, -3.5), (6.562, 6.75, 2200, 2360, -23),
         (8.625, 8.89, 1760, 1410, -14.5)]


def flap(grains, width_hz, waver=0.02, fade_s=0.043):
    """Breaks along the tear line shake the loose flap, whose pitch glides and wavers as it bends."""
    rows = np.array(FLAPS)
    pitch = np.interp(TIME, rows[:, :2].ravel(), rows[:, 2:4].ravel())
    pitch = pitch * np.exp(waver * evened(band(rng.standard_normal(N), 7.0, 47, order=2)))
    ring = resonate(resonate(grains, pitch, width_hz), pitch, width_hz)
    gain = sum(amp(db) * np.clip(np.minimum(TIME - start, end - TIME) / fade_s, 0, 1)
               for start, end, _, _, db in FLAPS)
    return gain * ring / running_rms(ring)


# fingers rubbing round the bulb: t/s, level/dB
FINGERS = [(7.85, -59), (8.13, -40), (8.22, -55), (8.31, -39), (8.4, -79), (8.5, -38.5), (8.62, -46),
           (8.95, -75)]


def fingers(grains, lo_hz=200, hi_hz=700):
    """Fingertips catch on the firm bulb with a dull, grainy rub."""
    s, db = np.transpose(FINGERS)
    return amp(np.interp(TIME, s, db, -120, -120)) * evened(band(grains, lo_hz, hi_hz, order=2))


# reverberation of the kitchen: f/Hz, t60/s
KITCHEN_T60 = [(120, 0.83), (500, 0.33), (2000, 0.24), (6000, 0.26), (15000, 0.16)]


def kitchen(x, first_s=0.0048):
    """Dense reflections from near walls, each band dying at its own speed."""
    taps = rng.standard_normal(SR // 2) * (np.arange(SR // 2) > first_s * SR)
    hz, t, z = signal.stft(taps, SR, nperseg=256)
    decay = amp(-60 * t / read(KITCHEN_T60, hz)[:, None])
    tail = signal.istft(z * decay, SR, nperseg=256)[1]
    return signal.fftconvolve(x, tail / np.linalg.norm(tail))[:N]


def scene():
    """Wet lettuce, dense onion and papery skin close to the microphone, over the board and the room."""
    close = lettuce() + drags() + ribs() + blade() + onion() + peel()
    wood = knocks()
    room = kitchen(amp(-13) * close + amp(-9.5) * wood)
    return (close + wood + room + worktop() + air())[None]


def record(dry, edge_hz=16300):
    """The recorder's band limit: a steep low-pass."""
    taps = signal.firwin(255, edge_hz, window=("kaiser", 9), fs=SR)
    return signal.oaconvolve(dry, taps[None], "same")


dry = scene()
out = record(dry)
log_audio(out)
```